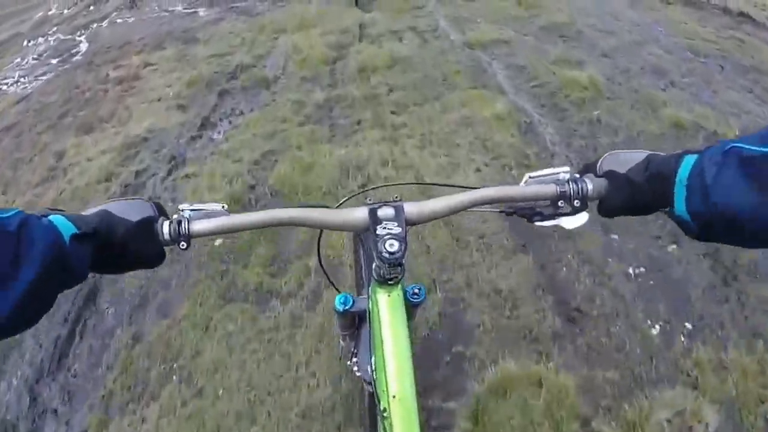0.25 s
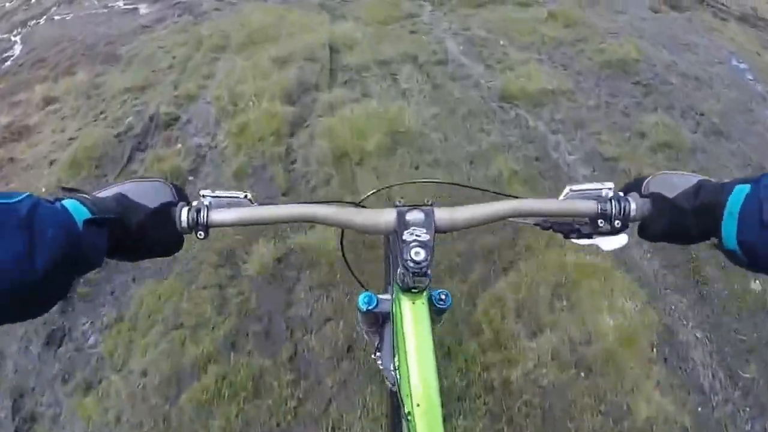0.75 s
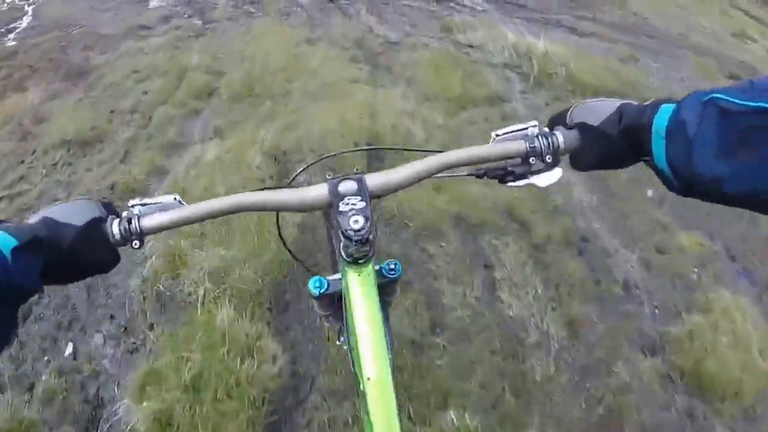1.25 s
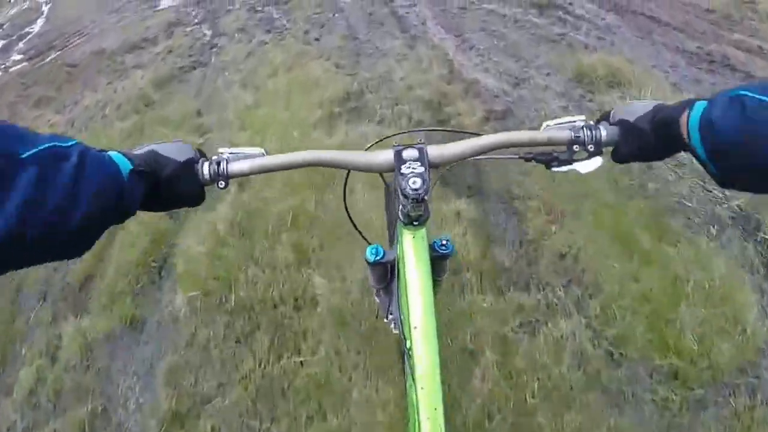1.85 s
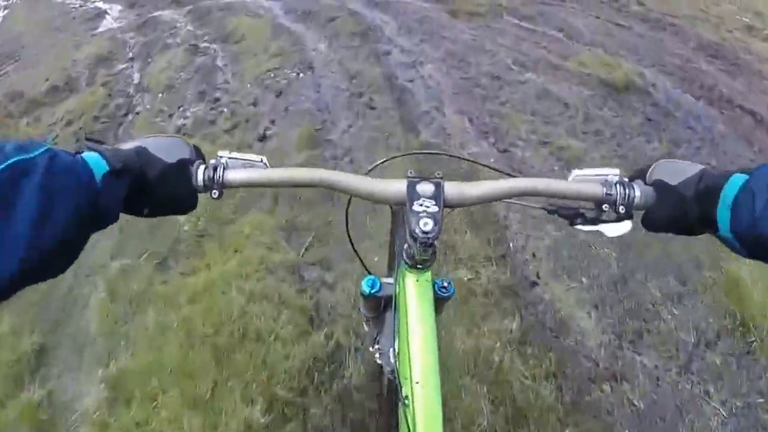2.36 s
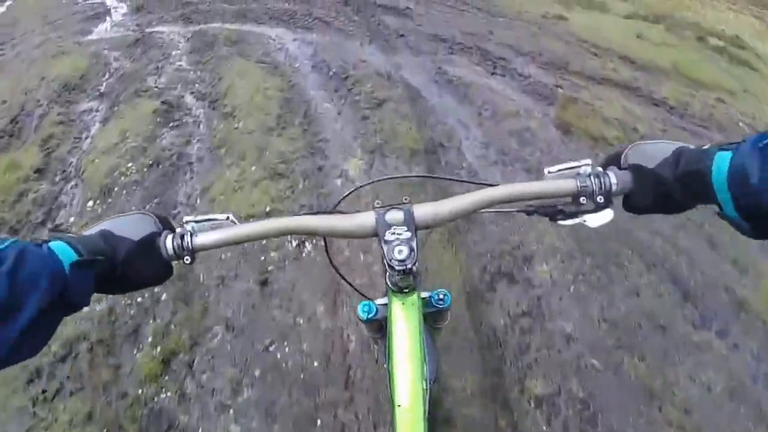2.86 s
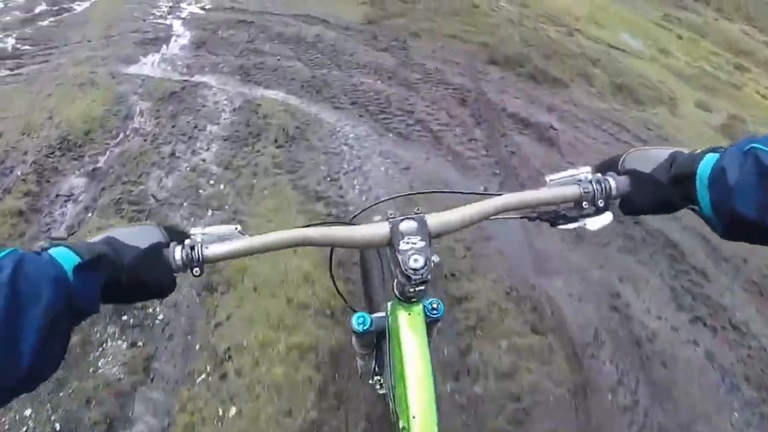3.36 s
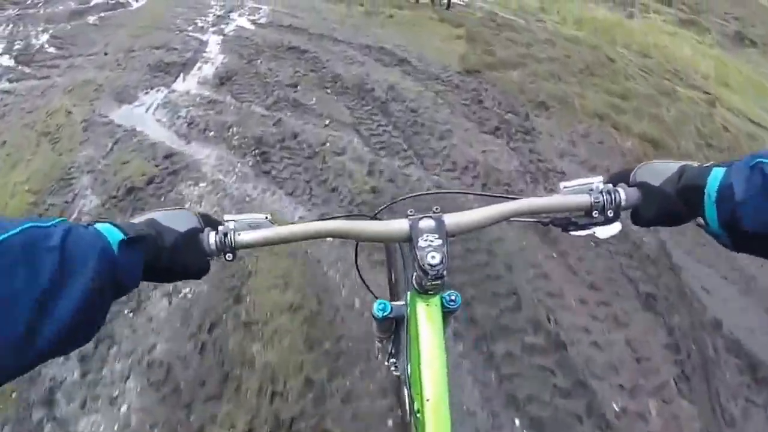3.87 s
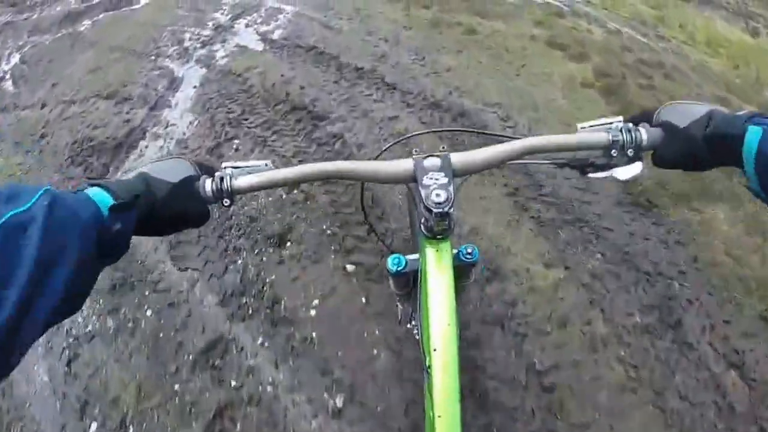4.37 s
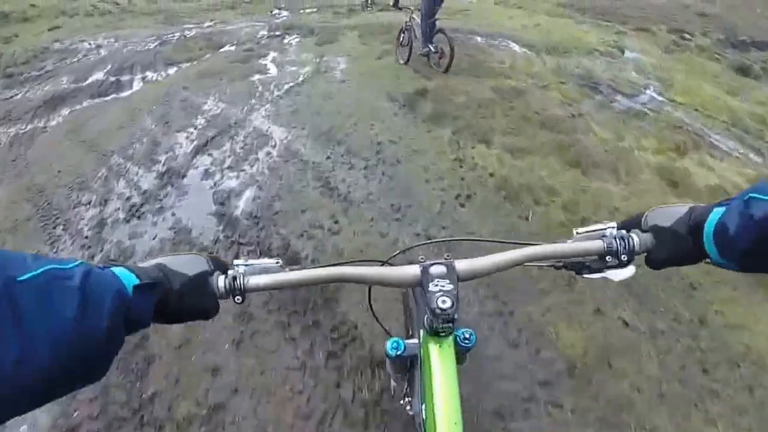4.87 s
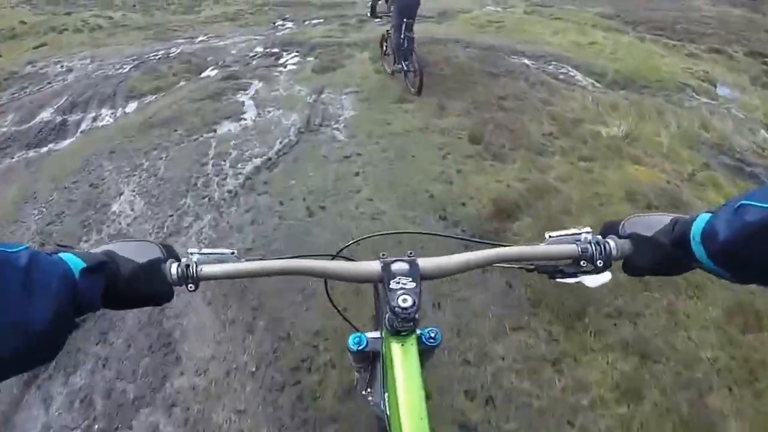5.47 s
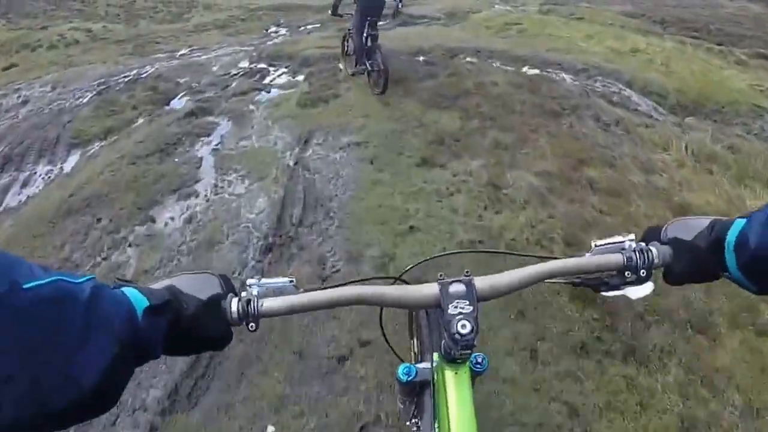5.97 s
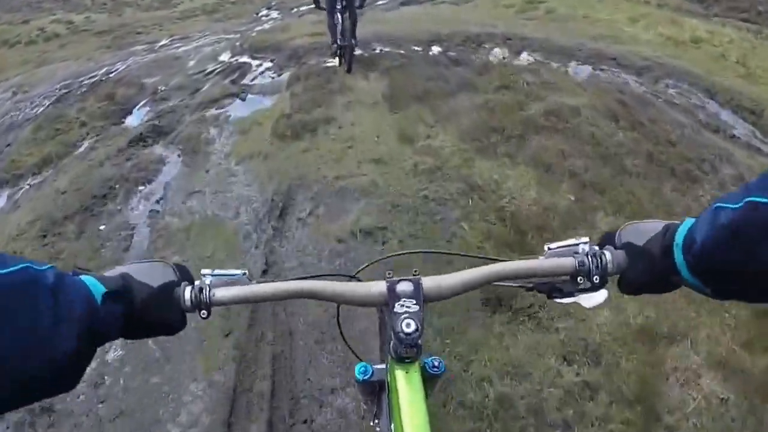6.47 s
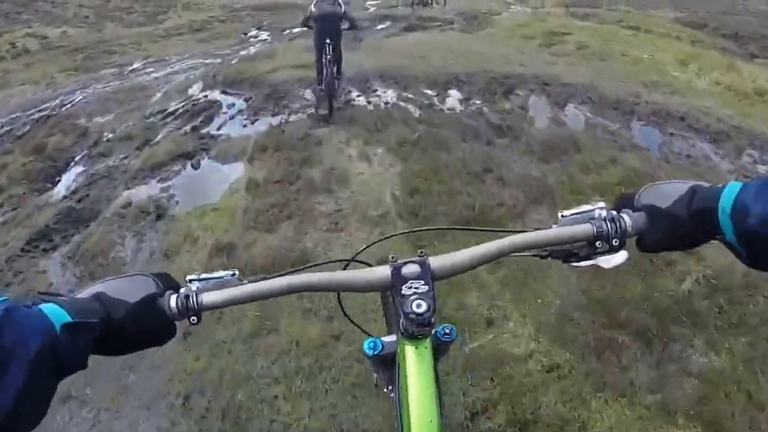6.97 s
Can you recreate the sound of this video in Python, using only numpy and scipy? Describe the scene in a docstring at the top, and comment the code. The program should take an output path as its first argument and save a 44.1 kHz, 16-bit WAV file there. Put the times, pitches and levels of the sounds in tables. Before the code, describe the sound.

A mountain bike rolls down wet grass and gritty mud with low buffeting rumble, sharp rattling knocks, heavy thuds and a brief wet brake squeal.

```python
"""A mountain bike coasts down wet grass, mud and grit, heard from a small housed camera on the rider's chest.
Throughout, wind noise buffets the housing, tread noise drums through the frame, and grains of crushed grit
and flung spray crackle. From the start bumps heave the camera and tyres scuff; from 1.4 s struck parts clack
as damped resonances and landings thud. From 5.3 to 6.1 s a wet disc brake squeals as a sum of rotor partials;
then the tyres roll on over a few more knocks and thuds."""
import sys
import numpy as np
from scipy import signal
from scipy.fft import rfft, irfft
from scipy.io import wavfile
from scipy.ndimage import uniform_filter1d

SR = 44100
rng = np.random.default_rng(int(sys.argv[2]) if len(sys.argv) > 2 else 0)


def wav_record(signal):
    """Record a signal, one row per channel, as 16-bit PCM in the file named by sys.argv[1]."""
    frames = np.transpose(np.atleast_2d(signal))
    bounded = np.clip(frames, -1, 1)
    # unit amplitude maps onto the largest positive 16-bit level
    quanta = np.round(bounded * 32767).astype(np.int16)
    wavfile.write(sys.argv[1], SR, quanta)


N = 318402
T = np.arange(N) / SR  # time of each sample [s]


def undb(db):
    """Decibels to amplitude ratio: 20 dB is a factor of ten."""
    return 10 ** (np.asarray(db) / 20)


def unit(x):
    """Normalisation to unit rms, so that a later gain sets the level."""
    return x / np.sqrt(np.mean(x ** 2))


def curves(table):
    """Linear interpolation of each column of a timed table, one value per sample."""
    times, *columns = np.transpose(table)
    return [np.interp(T, times, column) for column in columns]


def walk(rate):
    """Slow random modulation: levels held for 1 / rate s, smoothed by two moving averages, rms 1."""
    hold = max(int(SR / rate), 2)
    held = np.repeat(rng.standard_normal(N // hold + 2), hold)
    slewed = uniform_filter1d(uniform_filter1d(held, hold), hold)
    return unit(slewed[:N])


def swell(s, length):
    """Gaussian envelope of peak 1 at time s, down to 1/e at length seconds on either side."""
    return np.exp(-np.minimum(((T - s) / length) ** 2, 50))


def causal(x, db_at, size=16384):
    """Minimum-phase filtering by the folded cepstrum, gain db_at(Hz): it rings after a blow, never before."""
    hz = np.arange(size // 2 + 1) * SR / size + 1  # 1 Hz offset keeps log(hz) finite
    cepstrum = irfft(np.log(undb(db_at(hz))))
    cepstrum[1:size // 2] *= 2
    cepstrum[size // 2 + 1:] = 0
    response = irfft(np.exp(rfft(cepstrum)))
    return signal.fftconvolve(x, response)[:len(x)]


def colour(x, spectrum):
    """Spectral shaping: filter gain interpolated in dB over log frequency."""
    hz, db = np.transpose(spectrum)
    return causal(x, lambda f: np.interp(np.log(f), np.log(hz), db))


# resonances of the camera housing: (centre [Hz], width [Hz], lift [dB])
HOUSING_MODES = [(782, 63, 5.5), (1702, 150, 10), (2662, 460, 8.5), (3220, 73, 2), (5095, 700, 6.5),
                 (5830, 650, 7), (6630, 190, 8), (7850, 1730, 6.5), (10100, 490, 3.5)]


def housed(x):
    """Resonant transmission: sound from outside rings the modes of the plastic housing."""
    def lift_db(f):
        return sum(db / (1 + (2 * (f - hz) / width) ** 2) for hz, width, db in HOUSING_MODES)

    return causal(x, lift_db)


def band(x, hz, q):
    """Second-order resonance with gain 1 at its centre; q is centre over bandwidth, at least 0.6."""
    b, a = signal.iirpeak(min(hz, SR / 4), max(q, .6), fs=SR)
    return signal.lfilter(b, a, x)


def add(out, s, x):
    """Superposition: mix x into out from time s."""
    i = max(int(s * SR), 0)
    out[i:i + len(x)] += x[:max(N - i, 0)]


def grains(rate, spread_db, burst_s, size=1024):
    """Shot noise: random, unequal impacts, rate per second, each a noise burst decaying over burst_s."""
    chance = rng.random(N)
    strength = np.minimum(rng.exponential(size=N), 4)
    impacts = (chance < rate / SR) * undb(spread_db * strength) ** 2
    decay = np.exp(-2 * np.arange(size) / SR / burst_s)
    energy = signal.fftconvolve(impacts, decay)[:N]
    return unit(np.sqrt(np.abs(energy)) * rng.standard_normal(N))


# shaking, strong on tussocks and weak on smooth mud: (time [s], wind buffet [dB], tread rumble [dB])
RUMBLE_LEVELS = [(0, -42.5, -51), (.4, -42.5, -47.5), (1.1, -39, -53), (1.7, -38.5, -50.5), (2.1, -40, -51),
                 (2.8, -37.5, -52), (3.15, -41, -57.5), (3.55, -44.5, -57.5), (3.95, -44.5, -56.5),
                 (4.25, -38.5, -47.5), (4.7, -40.5, -50.5), (5.3, -41.5, -54), (6.0, -46.5, -54),
                 (6.5, -40, -49.5), (7.22, -44.5, -54)]
# filter applied to the wind noise: (frequency [Hz], gain [dB])
WIND_SPECTRUM = [(8, -22), (18, -2), (30, -1), (48, -6), (75, -10), (120, -18), (220, -34), (600, -60),
                 (4000, -100)]
# filter applied to the tread grains: (frequency [Hz], gain [dB])
TREAD_SPECTRUM = [(40, 2.5), (90, -13), (140, 0), (210, -2.5), (280, -5), (400, -9), (600, -17.5),
                  (1000, -18.5), (2500, -16), (8000, -104)]
SWAY_DB, SWAY_S = -13, 0.061  # air stirred by a heave: level relative to the bump, swell length
JUDDER_DB, JUDDER_S = -27, 0.058  # extra tread rumble: level relative to the thud, swell length


def shaking():
    """Turbulence and structure-borne sound: heaves add wind energy, landings add drumming of the tread."""
    sway_energy = sum((undb(db + SWAY_DB) * swell(s, SWAY_S)) ** 2 for s, db, _ in HEAVES)
    judder = sum(undb(db + JUDDER_DB) * swell(s, JUDDER_S) for s, db, _, _ in LANDINGS)
    wind_db, tread_db = curves(RUMBLE_LEVELS)
    eddies_db = 2 * walk(14)
    wind = unit(colour(rng.standard_normal(N), WIND_SPECTRUM) * undb(eddies_db))
    tread = unit(colour(grains(rate=200, spread_db=1.5, burst_s=0.01), TREAD_SPECTRUM))
    wind_gain = np.sqrt(undb(wind_db) ** 2 + sway_energy)
    return wind * wind_gain + tread * (undb(tread_db) + judder)


# the wheels drop into a hollow and are pushed back up: (time [s], peak level [dB], heave rate [Hz])
HEAVES = [(0.246, -28.5, 66), (0.634, -28.5, 58), (1.345, -25, 25), (1.409, -29, 62), (1.48, -21.5, 33),
          (1.799, -29, 60), (1.981, -20, 44), (2.222, -28.5, 22), (2.399, -23.5, 31), (2.581, -26, 44),
          (2.767, -28.5, 33), (2.969, -29, 39), (3.097, -23.5, 84), (3.349, -32.5, 53), (3.749, -32.5, 44),
          (4.154, -29.5, 58), (4.377, -14, 15.5), (4.428, -21, 22), (4.524, -29, 72), (4.931, -38.5, 63),
          (5.335, -29.5, 32), (5.692, -30, 55), (6.088, -30.5, 62), (6.244, -31, 48), (6.871, -29, 50),
          (7.167, -27.5, 30)]
HEAVE_CYCLES = 0.46  # decay of the heave, in its own cycles


def bumps():
    """Damped oscillation on both sides of the bump: the camera sinks, is thrown up sharply and settles."""
    out = np.zeros(N)
    for s, db, hz in HEAVES:
        phase = (T - s) * 2 * np.pi * hz
        # the hypotenuse rounds the tip of the two-sided decay
        decay = np.minimum(np.hypot(phase, .5) / (2 * np.pi * HEAVE_CYCLES), 20)
        heave = np.sin(phase) * np.exp(-decay)
        out += undb(db) * heave / heave.max()
    return out


# hard landings jolt the camera mount:
# (time [s], mount level [dB], mount ring [Hz], joint clack relative to the mount [dB])
LANDINGS = [(1.504, -26, 139, -12), (2.001, -22.5, 186, -9.5), (2.922, -48, 200, 7.5),
            (3.098, -34.5, 165, -12), (4.385, -23, 237, -31), (5.784, -34, 241, -2),
            (6.191, -37, 240, -8.5), (6.492, -38, 167, -14)]
LANDING_DB, LANDING_HZ, LANDING_S = -6.5, 108, 0.027  # harness: level relative to mount, pitch, decay
MOUNT_CYCLES, JOINT_HZ = 0.99, 820  # decay of the mount in its cycles; ring of its joint


def thuds(size=6000):
    """Impulse response of damped modes: mount and harness ring together while the joint clacks."""
    out, t = np.zeros(N), np.arange(size) / SR
    harness = undb(LANDING_DB) * np.sin(2 * np.pi * LANDING_HZ * t) * np.exp(-t / LANDING_S)
    for s, db, hz, clack_db in LANDINGS:
        mount = np.sin(2 * np.pi * hz * t) * np.exp(-t * hz / MOUNT_CYCLES)
        contact = rng.standard_normal(size) * np.exp(-t / 0.0033)
        joint = band(band(contact, JOINT_HZ, q=1.7), JOINT_HZ, q=.7)
        clack = undb(clack_db) * joint / np.abs(joint).max()
        add(out, s, undb(db) * (mount + harness + clack))
    return out


# chain, cables and stones strike the bike:
# (time [s], peak before the common trim [dB], ring [Hz], hollow body before its offset [dB])
STRIKES = [(1.4237, -31, 2700, -19), (1.4731, -24, 2650, -19), (1.506, -24, 2600, -16),
           (1.5519, -30, 2660, -27), (1.5748, -30, 2550, -17), (1.9465, -22, 2190, -19),
           (2.0004, -22, 2600, -14), (2.8804, -31, 2400, -21), (3.2879, -29, 2790, -26),
           (3.3288, -30, 2720, -30), (3.6825, -29, 2640, -20), (3.8372, -26, 2600, -22),
           (3.9913, -26, 2740, -24), (4.3156, -19.5, 2780, -22), (4.3695, -22, 2600, -21),
           (4.4124, -22, 2190, -19), (4.5715, -28, 2520, -21), (4.7745, -31, 2730, -25),
           (4.9257, -28, 3320, -28), (6.4358, -32, 3010, -27), (6.6593, -29, 2650, -21),
           (6.9835, -31, 2860, -25)]
KNOCK_DB, CRACK_Q = -2.5, 1  # common trim of all blows; q of the second resonance of the struck part


def knocks(size=4096):
    """Impact excitation: a noise pulse with a weaker, longer tail rings the struck part and the hollow frame."""
    out, t = np.zeros(N), np.arange(size) / SR
    pulse = t / .001 * np.exp(1 - t / .001)
    rebound = .12 * np.exp(-t / .012)
    for s, db, hz, body_db in STRIKES:
        contact = rng.standard_normal(size) * (pulse + rebound)
        crack = band(band(contact, hz, q=11.4), hz, q=CRACK_Q)
        body = housed(band(band(contact, 2430, q=0.84), 1320, q=1.7))
        blow = unit(crack) + undb(body_db + 15.5) * unit(body)
        add(out, s + .0008, undb(db + KNOCK_DB) * blow / np.abs(blow).max())
    return out


# brake rotor: (time [s], pitch [Hz], level [dB], lower mode [dB], octave above [dB])
ROTOR_SQUEAL = [(5.255, 1606, -59, -71, -79), (5.315, 1558, -39, -43, -47.5), (5.385, 1617, -35, -64, -54),
                (5.505, 1656, -48, -60, -81), (5.553, 1620, -37.5, -47, -69),
                (5.573, 1607, -17.5, -39.5, -33), (5.595, 1597, -22.5, -46.5, -35),
                (5.611, 1613, -17, -37.5, -34.5), (5.63, 1590, -26, -39, -33),
                (5.655, 1586, -22.5, -37.5, -36), (5.695, 1590, -22, -56, -34.5),
                (5.713, 1614, -31, -43.5, -30.5), (5.74, 1620, -27, -57, -57), (5.798, 1635, -40, -54, -67),
                (5.813, 1570, -24.5, -44, -45), (5.84, 1581, -32.5, -57, -45.5),
                (5.868, 1610, -32, -44.5, -59), (5.905, 1560, -48.5, -58, -65),
                (5.98, 1670, -43.5, -64, -73), (6.09, 1690, -61, -83, -78)]
# combination tones: (approximate multiple of the lower mode [ratio], level at full squeal [dB],
# growth [dB per dB of drive], build-up lag [s])
COMBINATION_TONES = [(3, -30.5, 1.5, 0.022), (5, -43.5, 2.0, 0.0013), (6, -49.5, 2.5, 0.0035),
                     (7, -57, 1.5, 0)]
ROTOR_HZ = 797  # rest pitch of the lower rotor mode
LOCK_DB, LOCK_WIDTH_DB = -26.5, 3  # the whine turns clean above this level, over about this range
LOOSE_ROUGH = 1  # scale of the roughness, which nears 2/3 of it far below the lock level


def brake():
    """Stick-slip friction as a sum of partials: a wavering whine locks into a clean squeal when loud."""
    hz, db, low_db, high_db = curves(ROTOR_SQUEAL)
    rough = np.clip(LOOSE_ROUGH / (1.5 + np.exp((db - LOCK_DB) / LOCK_WIDTH_DB)), 0, 1)
    gripping = (T > ROTOR_SQUEAL[0][0]) & (T < ROTOR_SQUEAL[-1][0])
    pulled = uniform_filter1d(1. * gripping, 600)
    main = 2 * np.pi * np.cumsum(hz * (1 + 0.0044 * walk(110))) / SR
    # a second rotor mode, about an octave down, is only partly dragged along in pitch
    low = 2 * np.pi * np.cumsum(ROTOR_HZ + 0.4 * (hz / 2 - ROTOR_HZ)) / SR

    def partial(phase, roughness, rate):
        """Partial coherence: a steady line, partly scattered as water breaks the contact."""
        scatter = (walk(rate) + 1j * walk(rate)) / np.sqrt(2)
        envelope = np.sqrt(1 - roughness ** 2) + roughness * scatter
        return np.sqrt(2) * np.real(envelope * np.exp(1j * phase))

    out = undb(db) * partial(main, rough, rate=200)
    out += undb(low_db) * partial(low, rough / 2, rate=63)
    out += undb(high_db) * partial(2 * main, rough ** 0.5, rate=320)
    # the contact mixes the two modes, so the overtones need both to be strong
    drive_db = (db + low_db) / 2
    for multiple, over_db, growth, lag in COMBINATION_TONES:
        felt_db = np.interp(T - lag, T, drive_db)
        tone_db = over_db + growth * (felt_db - drive_db.max())
        mains, lows = divmod(multiple, 1.986)
        out += undb(tone_db) * partial(mains * main + lows * low, rough, rate=200)
    return out * pulled


# a tyre scuffs sideways through wet turf:
# (time [s], level [dB], brightest pitch [Hz], length between about half-amplitude points [s])
TURF_SCUFFS = [(0.04, -45, 3170, 0.031), (.52, -52, 3600, 0.15), (0.762, -47, 2940, 0.031),
               (1.44, -46.5, 2410, 0.072), (1.827, -46, 2370, 0.041), (2.128, -45.5, 2900, 0.036),
               (2.676, -41, 2900, 0.029), (3.222, -42, 2820, 0.056), (3.348, -45, 2830, 0.059),
               (4.346, -48, 1690, 0.025), (4.405, -47.5, 2040, 0.053)]


def scuffs():
    """Sliding friction as resonant grain noise: short gritty swishes that swell and fade."""
    out = np.zeros(N)
    grit = grains(rate=2000, spread_db=1.0, burst_s=.0007)
    for s, db, hz, length in TURF_SCUFFS:
        envelope = np.exp(-(1.64 * (T - s) / length) ** 2)
        swish = unit(band(band(grit, hz, q=4.1), hz, q=0.95))
        out += undb(db) * envelope * swish
    return out


# ground from turf to wet grit and back, before the layer offsets:
# (time [s], crunch level [dB], wet spray level [dB])
GROUND_LEVELS = [(0, -50, -58.5), (0.25, -53.5, -63), (0.5, -49.5, -57.5), (0.7, -50, -56),
                 (1.5, -50.5, -57), (1.98, -47, -55.5), (2.1, -52, -65), (2.35, -51, -55.5),
                 (3.0, -48.5, -54.5), (3.3, -51, -54.5), (4.0, -49, -52.5), (4.7, -53, -56.5),
                 (5.2, -53, -57.5), (5.62, -49.5, -56), (5.9, -53, -58.5), (6.7, -52, -56.5),
                 (7.22, -53.5, -58)]
# a tyre presses into a wet patch: (time [s], crunch lift [dB], spray lift [dB], length between 1/e points [s])
WET_PATCHES = [(1.144, 5, 11, 0.027), (1.449, 5.5, 6, .04), (1.602, 7, 4, 0.063), (1.943, 3.5, 2, 0.046),
               (2.373, 7, 5, 0.13), (2.66, 5, 5, 0.077), (2.924, 5, 1, 0.016), (3.717, 3.5, 3, 0.077),
               (4.113, 4, 3.5, 0.028), (3.955, 4, 4.5, 0.028), (4.321, 9, 6.5, 0.084),
               (4.574, 8.5, 9.5, 0.038), (5.345, 4.5, 5, 0.12), (6.722, 8, 4, 0.037), (6.823, 5, 1, 0.16)]
# the tyres go light over a crest and quieten: (time [s], dip [dB], swell length [s])
CREST_LULLS = [(0.685, 5, 0.052), (2.587, 5, .02), (2.963, 4.5, .02), (4.157, 2.5, 0.032),
               (6.342, 7.5, 0.024)]
# filter applied to the crunch ahead of the housing: (frequency [Hz], gain [dB])
CRUNCH_SPECTRUM = [(200, -30), (550, -5), (950, -9.5), (1400, -5), (2200, -2.5), (3000, 2), (3900, -5),
                   (4700, -18), (8000, -35), (15000, -49)]
# filter applied to the spray ahead of the housing: (frequency [Hz], gain [dB])
SPRAY_SPECTRUM = [(2000, -31.5), (3600, 2.5), (4800, -5), (8000, -4.5), (9200, -10), (11500, -10),
                  (13500, -13), (15500, -20.5)]
PEBBLES_PER_S, PEBBLE_DB = 45, -10  # small stones that pop under the knobs; level relative to the grit


def tyres():
    """Granular fracture and droplet impact: knobs crush grit and tear mud in clumps; spray hits the frame."""
    crunch_db, spray_db = curves(GROUND_LEVELS)
    lulls_db = sum(db * swell(s, length) for s, db, length in CREST_LULLS)
    patches_db = 0.9 * walk(16) - lulls_db
    for s, crunch_lift_db, spray_lift_db, length in WET_PATCHES:
        press = swell(s, length / 2)
        crunch_db = crunch_db + crunch_lift_db * press
        spray_db = spray_db + spray_lift_db * press
    clumps, splashes = walk(70), walk(65)

    grit = grains(rate=480, spread_db=0.0, burst_s=0.0034)
    mud = rng.standard_normal(N)
    pebbles = grains(rate=PEBBLES_PER_S, spread_db=1.0, burst_s=0.004)
    crushed = grit + undb(-4.5) * mud + undb(PEBBLE_DB) * pebbles
    crunch = unit(housed(colour(crushed, CRUNCH_SPECTRUM)))

    # each size of droplet ticks at its own pitch, over a fine steady mist
    drops = 0
    for hz in np.geomspace(4200, 13000, num=5):
        ticks = grains(rate=550, spread_db=4.5, burst_s=0.0056)
        drops = drops + unit(band(ticks, hz, q=3.4))
    mist = rng.standard_normal(N)
    flung = unit(drops) + undb(-6.0) * grit + undb(-7) * mist
    spray = unit(housed(colour(flung, SPRAY_SPECTRUM)))

    crunch_gain = undb(crunch_db + 2.0 + 0.89 * clumps)
    spray_gain = undb(spray_db + 0.21 + 0.23 * clumps + 1.3 * splashes)
    return undb(patches_db) * (crunch * crunch_gain + spray * spray_gain)


def scene():
    """Linear superposition of everything that reaches the camera."""
    return (tyres() + scuffs() + shaking() + bumps() + knocks() + thuds() + brake())[None]


TOP_HZ = 15500  # upper band edge


def record(dry):
    """Band limiting: the camera drops the deepest rumble and cuts the top steeply."""
    rumble_cut = signal.butter(1, 12, "high", fs=SR, output="sos")
    top_cut = signal.ellip(10, .2, 80, TOP_HZ, fs=SR, output="sos")
    thinned = signal.sosfilt(rumble_cut, dry)
    return signal.sosfilt(top_cut, thinned)


dry = scene()
out = record(dry)
wav_record(out)
```